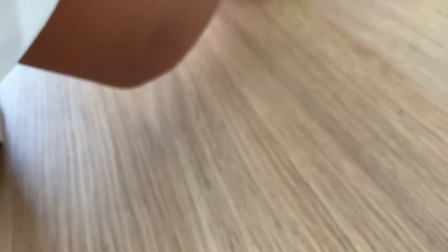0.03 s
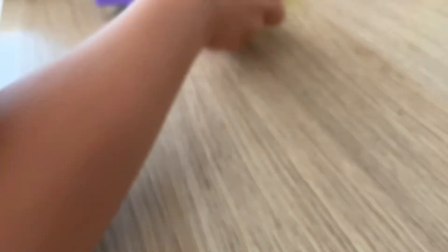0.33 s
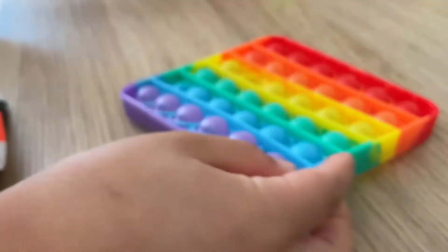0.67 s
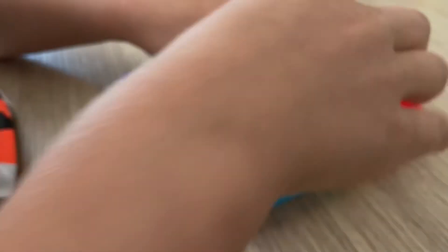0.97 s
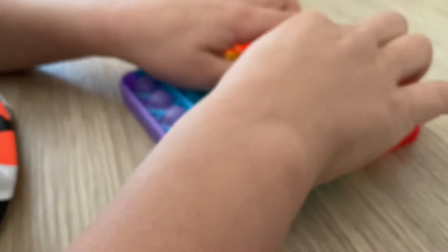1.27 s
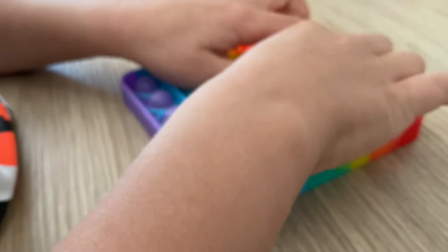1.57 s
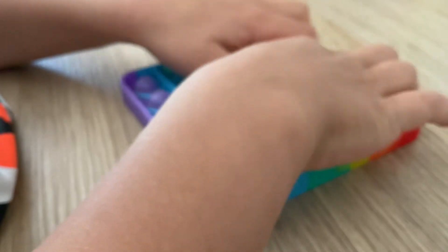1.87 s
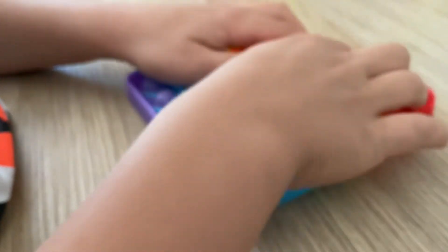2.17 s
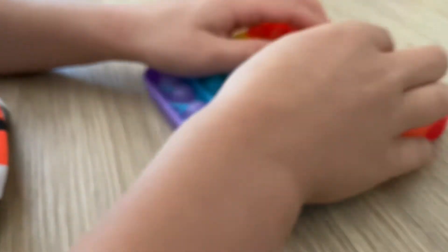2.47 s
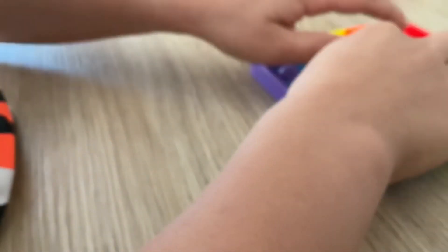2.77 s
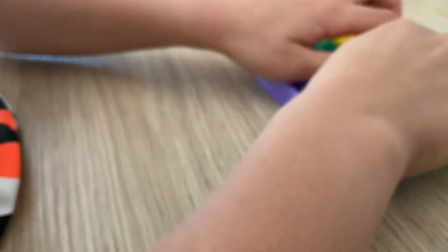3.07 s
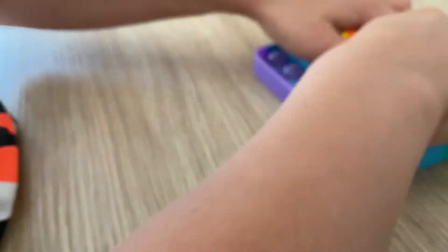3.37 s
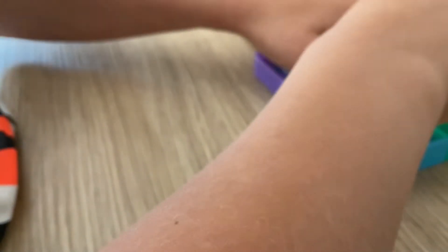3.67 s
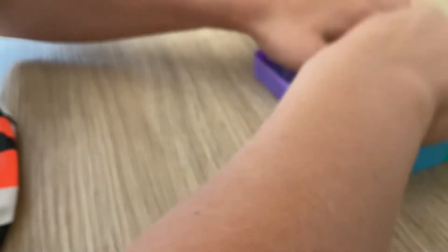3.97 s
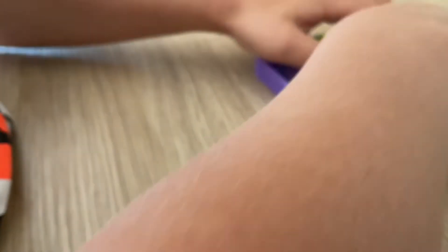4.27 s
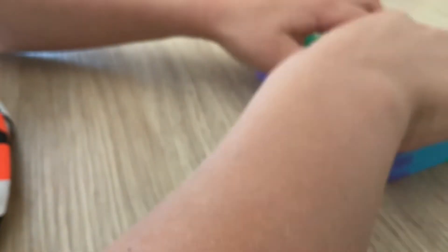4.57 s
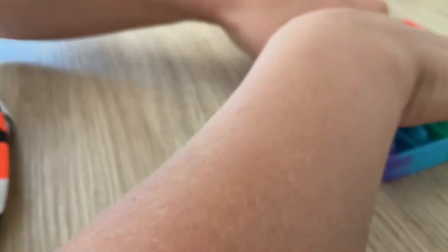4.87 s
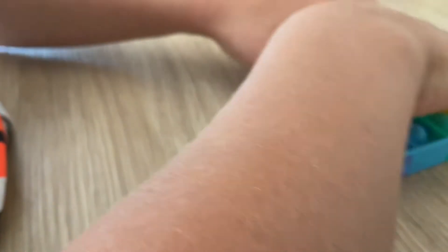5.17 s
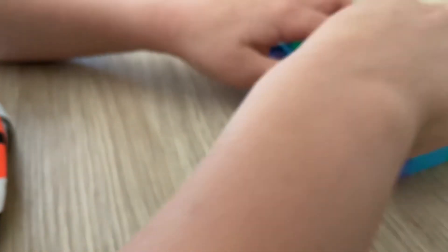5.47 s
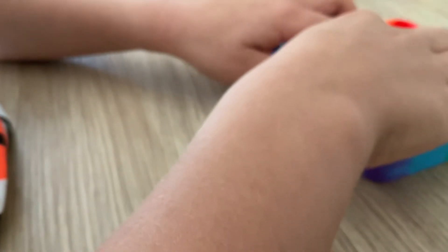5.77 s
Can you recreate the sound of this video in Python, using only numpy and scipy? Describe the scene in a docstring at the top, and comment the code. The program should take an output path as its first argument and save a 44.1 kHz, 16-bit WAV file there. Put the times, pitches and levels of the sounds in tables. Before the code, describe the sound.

Hands drag a silicone bubble toy over a wooden table, then press its domes in irregular soft plops and sharp little pops.

```python
"""A silicone bubble toy on a wooden table in a small, quiet room, the microphone close by.
Skin brushes the rubber and the toy is dragged over the wood, squeaking and knocking as it is turned.
Fingers dent the domes with soft plops; domes snap through with a click and a short hollow note.
The toy is dropped flat, then pressed again in a longer run of pops. Firm pushes set the table top
ringing, and the room answers the toy."""
import sys
import numpy as np
from scipy import signal
from scipy.fft import rfft, irfft, next_fast_len
from scipy.io import wavfile
from scipy.ndimage import uniform_filter1d, map_coordinates

SR = 44100
rng = np.random.default_rng(int(sys.argv[2]) if len(sys.argv) > 2 else 0)


def generate_wav(signal):
    """Clip the signal to [-1, 1] and save it as 16-bit WAV at the path in sys.argv[1]."""
    frames = np.transpose(np.atleast_2d(signal))
    scaled = np.clip(frames, -1, 1) * 32767
    pcm = np.round(scaled).astype(np.int16)
    wavfile.write(sys.argv[1], SR, pcm)


N = 265482
T = np.arange(SR // 3) / SR  # time axis of one short sound, s


def amp(db):
    """Decibels to gain."""
    return 10 ** (np.asarray(db) / 20)


def unit(x):
    """x at rms 1."""
    return x / np.sqrt(np.mean(x ** 2) + 1e-20)


def burst(x, size=256):
    """x at rms 1 over its loudest few milliseconds."""
    return x / np.sqrt(uniform_filter1d(x ** 2, size, mode="constant").max() + 1e-20)


def along(points, hz):
    """(frequency_hz, value) points read on a log axis."""
    freqs, values = np.transpose(points)
    return np.interp(np.log(hz + 1), np.log(freqs + 1), values)


def wobble(rate):
    """A smooth random curve, rate knots a second."""
    knots = rng.standard_normal(int(N * rate / SR) + 4)
    return map_coordinates(knots, [np.arange(N) * rate / SR])


def filtered(x, response):
    """x times a complex response of frequency."""
    size = next_fast_len(len(x) + SR // 2)
    return irfft(rfft(x, size) * response(np.fft.rfftfreq(size, 1 / SR)), size)[:len(x)]


def coloured(x, spectrum, size=4096):
    """x through a causal filter with the given spectrum."""
    cepstrum = irfft(np.log(amp(along(spectrum, np.fft.rfftfreq(size, 1 / SR)))))
    cepstrum[1:size // 2] *= 2
    cepstrum[size // 2 + 1:] = 0
    return signal.fftconvolve(x, irfft(np.exp(rfft(cepstrum))))[:len(x)]


def noise(spectrum):
    """Steady coloured noise of rms 1."""
    return unit(coloured(rng.standard_normal(N), spectrum))


def fade(t60):
    """A decay that loses 60 dB in t60 seconds."""
    return np.exp(-np.log(1000) * T / t60)


def puff(spectrum, t60, jolt=0, size=2048):
    """A jolt and a short dying burst of noise, coloured by the spectrum."""
    push = (rng.standard_normal(len(T)) * fade(t60))[:round(t60 * SR) + size]
    push[0] += jolt * np.linalg.norm(push)
    return np.pad(burst(coloured(push, spectrum, size)), (0, len(T) - len(push)))


def swell(length_s, rise, fall):
    """A movement speeds up, holds and slows down; rise and fall are shares of its length."""
    progress = np.linspace(0, 1, round(length_s * SR))
    return np.clip(np.minimum(progress / rise, (1 - progress) / fall), 0, 1)


def add(track, start_s, x):
    """Mix x into the track at start_s."""
    i = max(round(start_s * SR), 0)
    track[i:i + len(x)] += x[:N - i]


def hands(hiss_hz=13300, hiss_octaves=0.4, grain_db=2, pressure_db=2):
    """Dry skin brushes the silicone: each stroke is a soft, grainy swish with a high hiss on top."""
    # strokes of a hand: start_s, length_s, swish_db, hiss_db
    strokes = [(0.03, .68, -62, -71.5), (0.58, 0.75, -63, -72.5), (0.759, .055, -63, -65.5),
               (1.316, 0.27, -74, -81), (1.817, 0.22, -66.5, -86), (1.992, 0.22, -68, -75),
               (2.117, 0.14, -55, -58.5), (2.212, 0.47, -61, -75), (2.726, 0.15, -69, -85),
               (3.103, 0.63, -69.5, -84.5), (4.068, 0.32, -69.5, -89), (4.246, .045, -57.5, -94),
               (4.517, 0.15, -61.5, -88.5), (4.91, 0.67, -70, -83.5), (5.992, 0.14, -47.5, -78)]
    # skin on rubber: frequency_hz, level_db
    swish_spectrum = [(60, -71), (350, 5.5), (900, 3), (2100, -0.5), (2900, -0.5), (3900, -2.5),
                      (5100, -3.5), (7000, -10), (10000, -22), (15000, -19)]
    swish_gain, hiss_gain = np.zeros(N), np.zeros(N)
    for start_s, length_s, swish_db, hiss_db in strokes:
        speed = swell(length_s, rise=0.41, fall=0.33)
        add(swish_gain, start_s, amp(swish_db + 0.15) * speed)
        add(hiss_gain, start_s, amp(hiss_db) * speed)
    band = lambda hz: 1 / (1 + (np.log2((hz + 1) / hiss_hz) / hiss_octaves) ** 2)
    hiss = hiss_gain * unit(filtered(rng.standard_normal(N), band))
    swish = swish_gain * noise(swish_spectrum)
    return (swish + hiss) * amp(grain_db * wobble(90) + pressure_db * wobble(14))


def drag(slips_per_s=2500, grip_db=2):
    """The dragged rubber sticks and slips on the wood grain."""
    # course of the drag: time_s, level_db
    course = [(0.08, -69.5), (0.16, -62.5), (0.2, -46), (0.26, -50.5), (0.285, -37), (0.44, -31.5),
              (0.53, -43), (0.59, -39.5), (0.65, -88), (0.8, -85)]
    # rubber on wood: frequency_hz, level_db
    slip_spectrum = [(60, -53), (200, -21), (380, -4), (560, -18.5), (720, 3.5), (850, -3.5), (1100, -15.5),
                     (1500, -18), (2300, -26), (4000, -41), (8000, -65)]
    times, levels = np.transpose(course)
    level_db = np.interp(np.arange(N) / SR, times, levels, left=-140, right=-140)
    slips = (rng.random(N) < slips_per_s / SR) * rng.standard_normal(N)
    slips *= amp(grip_db * wobble(70))
    return amp(level_db - 1) * unit(coloured(slips, slip_spectrum))


def judders(rows, steady_cycles, spread_hz, overtone_db, rise, fall):
    """Rubber sticks and slips at a gliding rate; its grip keeps breaking, which roughens the tone."""
    out = np.zeros(N)
    for start_s, length_s, first_hz, last_hz, level_db in rows:
        force = swell(length_s, rise, fall)
        t = np.arange(len(force)) / SR
        cycles = np.cumsum(np.geomspace(first_hz, last_hz, len(t))) / SR
        breaks = cycles / steady_cycles + spread_hz * t
        grip = [map_coordinates(row, [breaks], mode="mirror") for row in rng.standard_normal((4, 256))]
        turn = np.exp(2j * np.pi * cycles)
        fundamental = (grip[0] + 1j * grip[1]) * turn
        overtone = amp(overtone_db) * (grip[2] + 1j * grip[3]) * turn ** 2
        add(out, start_s, amp(level_db) * force * unit((fundamental + overtone).real))
    return out


def squeaks():
    """Rubber gripping wood or skin tightly slips almost regularly: a thin, wavering tone."""
    # tight slides: start_s, length_s, first_hz, last_hz, level_db
    slides = [(0.145, 0.045, 565, 490, -51), (0.185, 0.1, 864, 825, -54), (0.31, 0.2, 730, 714.4, -39.5),
              (2.262, 0.047, 4750, 4805, -56), (2.24, 0.28, 8500, 8940, -76),
              (4.25, 0.029, 3200, 3370, -53), (5.84, 0.018, 589, 542, -32.5)]
    return judders(slides, steady_cycles=14, spread_hz=21, overtone_db=-27.5, rise=0.43, fall=0.31)


def contacts(rows, *, jolt, snap_db, snap_t60, slap_db, slap_t60, slap_share, tick_db, tick_share,
             fizz_db, note_db, note_t60, knock_db, knock_t60, thud_db, thud_grows, lead_in_db):
    """Each contact cracks the rubber wall, rings the air under a dome and thuds on the table."""
    # spectra of the parts of a contact: frequency_hz, level_db
    snap_spectrum = [(300, -73), (1200, -30), (2300, -3), (3000, 12), (3700, 5), (4400, -10.5), (5300, -31),
                     (9000, -63)]
    slap_spectrum = [(150, -72.5), (600, -22.5), (1000, -7.5), (1400, 0), (1950, 0.5), (2500, -13.5),
                     (4000, -24), (9000, -69.5)]
    tick_spectrum = [(1500, -61.5), (3800, -3.5), (4800, 2), (6400, 0.5), (7700, -12.5), (9000, -21.5),
                     (13000, -52)]
    fizz_spectrum = [(2000, -69), (6000, -1.5), (8000, 4), (10000, -2.5), (13000, -1.5), (16000, 0)]
    knock_spectrum = [(40, -70.5), (150, -24.5), (280, 1), (400, 7.5), (700, 6), (1100, 2.5), (1500, -5.5),
                      (2500, -31.5), (6000, -75.5)]
    thud_spectrum = [(20, -65.5), (50, -16.5), (78, -1), (130, -10), (190, -2.5), (245, -5), (330, -5.5),
                     (700, -46.5), (2000, -88.5)]
    out = np.zeros(N)
    usual_cavity = np.mean(rows, axis=0)[3]
    for start_s, snap_level, cavity_hz, cavity_level, fizz_level in rows:
        # no two domes are equally stiff, so each snaps at its own pitch
        dome_spectrum = np.array(snap_spectrum) * [2 ** (0.07 * rng.standard_normal()), 1]
        snap = amp(snap_level + snap_db) * puff(dome_spectrum, snap_t60, jolt)
        # the slap grows with both the snap and the air it moves
        slap_level = cavity_level + slap_share * (snap_level - cavity_level)
        slap = amp(slap_level + slap_db) * puff(slap_spectrum, slap_t60, jolt)
        # skin slipping off the rubber ticks and fizzes
        tick_level = fizz_level + tick_share * (snap_level - fizz_level)
        tick = amp(tick_level + tick_db) * puff(tick_spectrum, 0.038, jolt)
        fizz = amp(fizz_level + fizz_db) * puff(fizz_spectrum, 0.035)
        # the trapped air rings briefly; the soft rubber around it gives a broader knock
        ring = np.sin(2 * np.pi * cavity_hz * T) * fade(note_t60) * (1 - np.exp(-T / 0.0013))
        note = amp(cavity_level + note_db) * burst(ring)
        knock = amp(cavity_level + knock_db) * puff(knock_spectrum, knock_t60, jolt)
        # a firmer push than usual thuds harder
        thud = amp(thud_db + thud_grows * (cavity_level - usual_cavity)) * puff(thud_spectrum, 0.21)
        add(out, start_s + 0.0008, snap + slap + tick + fizz + note + knock + thud)
        # a faint, brief rise of noise leads into each click
        dying_noise = (amp(snap_level + snap_db) * puff(snap_spectrum, 0.019)
                       + amp(cavity_level) * puff(knock_spectrum, 0.019)
                       + amp(fizz_level + 9.5) * puff(fizz_spectrum, 0.047))
        lead_in = amp(lead_in_db) * dying_noise[:SR // 40][::-1]
        add(out, start_s - len(lead_in) / SR, lead_in)
    return out


def knocks():
    """The toy lands on the wood and flaps briefly; the air under its domes rings."""
    # the rim hitting the table: start_s, snap_db, cavity_hz, cavity_db, fizz_db
    landings = [(0.2687, -30, 466, -20, -70.5), (0.3088, -63, 830, -27, -68.5),
                (0.3578, -47, 740, -30.5, -69.5), (0.544, -38, 527, -23, -67.5),
                (0.6239, -54, 472, -33, -68), (0.822, -39, 504, -25.5, -58.5),
                (2.3688, -37, 460, -27.5, -64), (2.383, -72, 410, -36.5, -86),
                (2.597, -29.5, 1070, -24.5, -56), (2.6661, -20, 1067, -22.5, -45.5),
                (2.6735, -42.5, 433.5, -18.5, -63)]
    return contacts(landings, jolt=0.63, snap_db=-13.5, snap_t60=0.029,
                    slap_db=-3.5, slap_t60=0.037, slap_share=0.69,
                    tick_db=-1.5, tick_share=0.4, fizz_db=-3,
                    note_db=-1, note_t60=0.03, knock_db=-3.5, knock_t60=0.085,
                    thud_db=-38, thud_grows=0.55, lead_in_db=-22)


def rubs():
    """A loosely sliding finger makes the rubber judder: a low, rough groan."""
    # loose slides: start_s, length_s, first_hz, last_hz, level_db
    slides = [(0.667, 0.097, 487, 317, -41), (0.852, 0.43, 435, 419, -67), (1.168, 0.061, 456.5, 357, -61),
              (1.306, 0.024, 486, 474, -64.5), (2.13, 0.077, 325, 140, -45.5), (2.408, .085, 544, 914, -38),
              (3.161, 0.038, 464, 540, -64.5), (3.485, .06, 643, 722, -60), (4.238, 0.07, 648, 329, -51.5)]
    return judders(slides, steady_cycles=2.2, spread_hz=180, overtone_db=-12.5, rise=0.29, fall=0.32)


def table_top():
    """A firm push sets the table top ringing."""
    # low modes of the wood: pitch_hz, level_db, t60_s
    modes = [(109.3, 6, 0.3), (167, -12.5, 0.48)]
    # pushes that bottom out: start_s, level_db
    pushes = [(1.06, -60), (2.169, -48.5), (2.265, -57.5), (2.674, -42.5), (3.286, -45.5), (3.971, -44.5),
              (4.588, -68.5), (5.191, -54.5)]
    ring = sum(amp(db) * np.sin(2 * np.pi * hz * T) * fade(t60) for hz, db, t60 in modes)
    boom = burst(ring * (1 - np.exp(-T / 0.013)))
    out = np.zeros(N)
    for start_s, level_db in pushes:
        add(out, start_s, amp(level_db) * boom)
    return out


def presses():
    """A fingertip dents a dome: a soft, hollow plop."""
    # dents: start_s, snap_db, cavity_hz, cavity_db, fizz_db
    dents = [(1.1772, -47.5, 600, -55.5, -75.5), (1.3851, -48, 465, -61.5, -64),
             (1.5784, -49, 441, -56.5, -67.5), (1.5978, -63, 410, -52.5, -55.5),
             (1.6771, -41, 670, -44.5, -67), (1.9487, -42.5, 424, -51.5, -63.5),
             (2.0675, -41, 393, -59.5, -64), (2.2661, -44.5, 403, -50, -62),
             (2.2824, -47.5, 430, -64.5, -62), (3.273, -34, 903, -42, -73), (3.2868, -42, 450, -31.5, -56),
             (3.3266, -37.5, 590, -36.5, -65), (3.3503, -32.5, 564, -44, -52), (3.3943, -44, 407, -38, -69),
             (3.4248, -40, 453, -45, -84.5), (3.7041, -31, 670, -39.5, -92),
             (3.9119, -52.5, 578, -38, -59.5), (3.9479, -31, 880, -40.5, -53),
             (3.9563, -31.5, 794, -34, -48.5), (4.535, -47, 655, -46.5, -57), (4.576, -29, 358, -26, -47),
             (4.6194, -33, 720, -37, -64.5), (5.1625, -41.5, 625, -36, -53), (5.3862, -40, 642, -50, -83),
             (5.4608, -58.5, 430, -52.5, -70), (5.5588, -56.5, 457, -55.5, -79),
             (5.8715, -32, 607, -35, -62), (5.8859, -27, 820, -29, -41.5)]
    return contacts(list(dents) + light_touches(), jolt=0.23, snap_db=-14, snap_t60=0.049,
                    slap_db=-9, slap_t60=0.023, slap_share=0.43,
                    tick_db=-7, tick_share=0.49, fizz_db=-4,
                    note_db=0, note_t60=0.028, knock_db=-4.5, knock_t60=0.088,
                    thud_db=-63.5, thud_grows=0.9, lead_in_db=-23)


def light_touches(count=3, scatter_db=3, scatter_octaves=0.2):
    """Fingertips feel for the next dome: rows of faint dents at random moments, for presses()."""
    # searches: start_s, end_s
    searches = [(1.46, 1.54), (3.081, 3.2), (5.31, 5.37)]
    rows = []
    for start_s, end_s in searches:
        times = start_s + (end_s - start_s) * (np.arange(count) + rng.random(count)) / count
        for time_s, (force, pitch) in zip(times, rng.standard_normal((count, 2))):
            snap_db, cavity_db, fizz_db = np.array([-56.5, -62.5, -73.5]) + scatter_db * force
            rows.append((time_s, snap_db, 450 * 2 ** (scatter_octaves * pitch), cavity_db, fizz_db))
    return rows


def pops():
    """A dome buckles all at once: a hard, bright snap."""
    # domes snapping through: start_s, snap_db, cavity_hz, cavity_db, fizz_db
    snaps = [(1.6346, -24.5, 628, -29.5, -47.5), (1.7968, -31.5, 570, -44, -58),
             (1.8117, -20.5, 553, -38.5, -53), (1.8425, -16.5, 1310, -37.5, -62.5),
             (3.549, -33.5, 687, -36.5, -74.5), (3.5538, -31, 680, -47.5, -88),
             (3.6528, -22, 914, -31.5, -89.5), (3.9666, -29, 386, -42.5, -48.5),
             (3.9965, -17.5, 370, -34, -57.5), (4.5875, -18.5, 426, -23, -49.5),
             (4.6583, -19.5, 630, -29.5, -58.5), (4.7721, -25, 330, -30.5, -56),
             (5, -32, 647, -36.5, -81.5), (5.1901, -22.5, 543, -32, -55), (5.892, -14, 698, -30.5, -37)]
    return contacts(snaps, jolt=0.44, snap_db=-6.5, snap_t60=0.018,
                    slap_db=-11, slap_t60=0.037, slap_share=0.82,
                    tick_db=-6, tick_share=0.55, fizz_db=5,
                    note_db=-3, note_t60=0.033, knock_db=0, knock_t60=0.033,
                    thud_db=-55.5, thud_grows=0.7, lead_in_db=-27)


def shell(x):
    """The body of the toy, lying on the wood, resonates with each touch."""
    # resonances: centre_hz, width_hz, level_db
    modes = [(243.7, 12, 7), (317, 19, -0.5), (388, 12, 3), (433.4, 8, 2.5), (569, 140, -3.5),
             (657, 23, -1.5), (713, 6.4, -0.5), (812, 11, -7), (945, 36, -1), (1047, 35, -4),
             (1220, 28, -4.5), (1480, 37, 0), (1790, 130, -6.5)]
    return filtered(x, lambda hz: sum(
        amp(db) * 1j * hz * width / (centre ** 2 - hz ** 2 + 1j * hz * width)
        for centre, width, db in modes))


def room(x, early_db=-11, early_t60=0.084, late_db=-19):
    """Arms and table scatter the sound at once; the walls answer later, differently as the hands move."""
    # reverberation times: frequency_hz, t60_s
    decay_times = [(100, 0.49), (500, 0.22), (1500, 0.29), (3200, 0.356), (7000, 0.48), (15000, 0.51)]
    # colour of the walls: frequency_hz, gain_db
    wall_spectrum = [(100, -18), (250, 4), (500, 14.5), (1800, 4.5), (3300, 0.5), (6000, 2.5), (15000, 0.5)]
    out = np.zeros(N)
    for piece in np.array_split(np.arange(N), 14):  # each stretch gets its own random reflections
        hz, t, bands = signal.stft(rng.standard_normal(SR // 2), SR, nperseg=256)
        bands *= np.exp(-np.log(1000) * t / along(decay_times, hz)[:, None])
        tail = signal.istft(bands, SR, nperseg=256)[1][:len(T)]
        tail = coloured(tail / np.linalg.norm(tail) * (1 - np.exp(-T / 0.0028)), wall_spectrum)
        early = rng.standard_normal(len(T)) * fade(early_t60) * (T > 0.002)
        answer = amp(late_db) * tail + amp(early_db) * early / np.linalg.norm(early)
        add(out, piece[0] / SR, signal.fftconvolve(x[piece], answer))
    return out


def room_tone(level_db=-75.5):
    """A faint, steady rumble and hiss lies under everything."""
    # the quiet room: frequency_hz, level_db
    spectrum = [(15, -48.5), (28, -24), (60, -3.5), (92, -9), (170, -16), (400, -14), (700, -22),
                (2000, -26), (6700, -35), (9000, -43), (13600, -31), (16000, -34)]
    return amp(level_db) * noise(spectrum)


def scene(direct_db=-3, shell_db=-5):
    """From close by, the toy is heard directly, through its shell and off the walls."""
    touches = pops() + presses() + knocks() + drag() + rubs() + squeaks()
    toy = amp(direct_db) * touches + amp(shell_db) * shell(touches)
    return (toy + room(toy) + table_top() + hands() + room_tone())[None]


def record(dry, low_hz=50, top_hz=16300):
    """One close microphone thins the deep bass and keeps nothing above its band limit."""
    low_cut = signal.butter(2, low_hz, "highpass", fs=SR, output="sos")
    return filtered(signal.sosfilt(low_cut, dry[0]), lambda hz: hz < top_hz)[None]


dry = scene()
out = record(dry)
generate_wav(out)
```